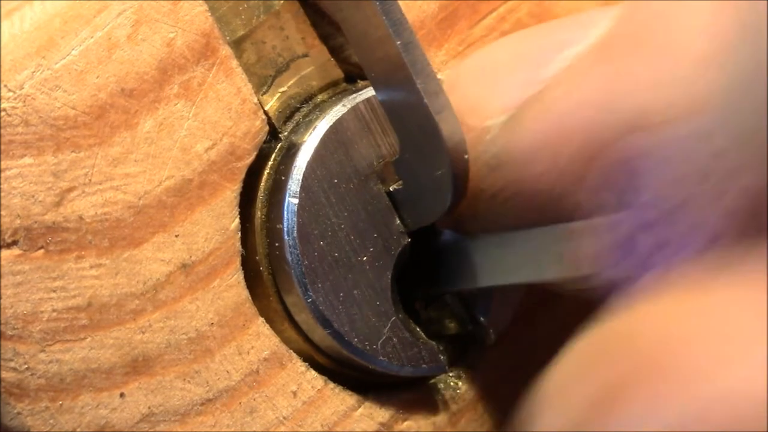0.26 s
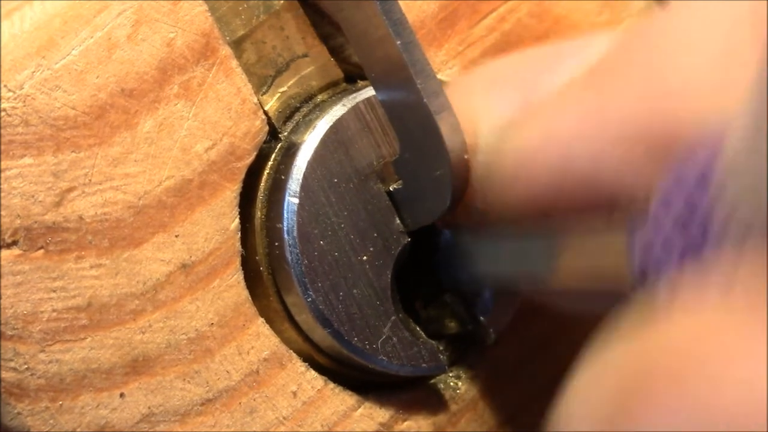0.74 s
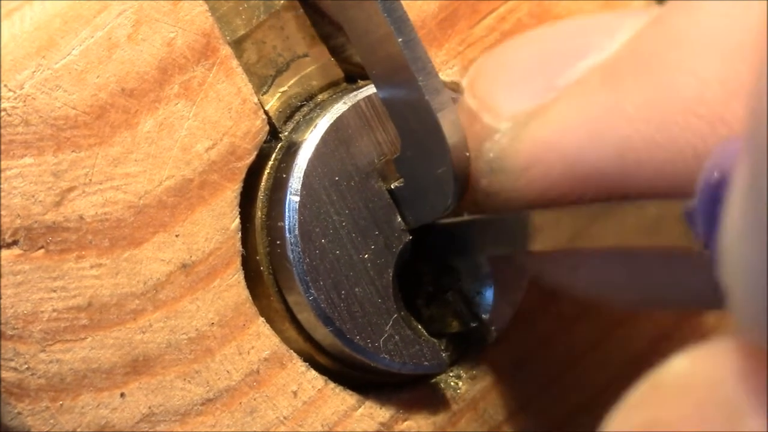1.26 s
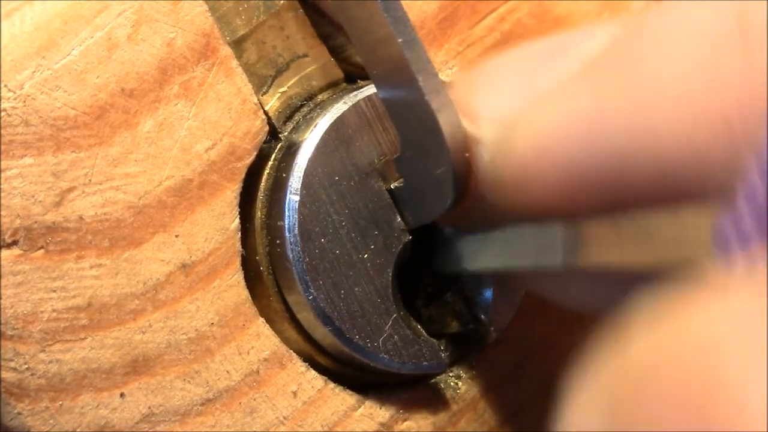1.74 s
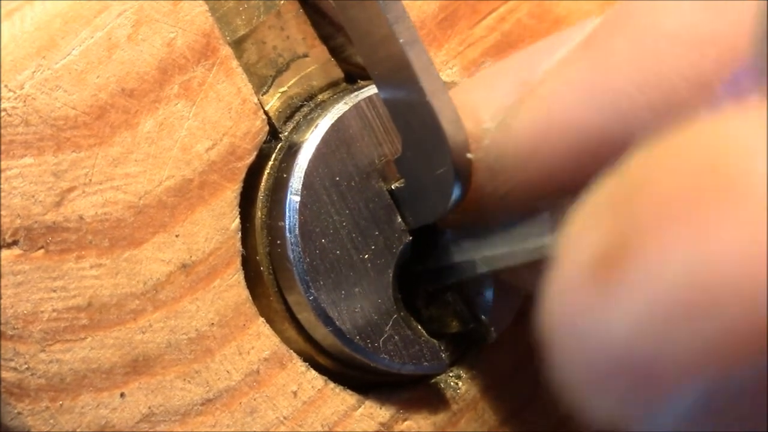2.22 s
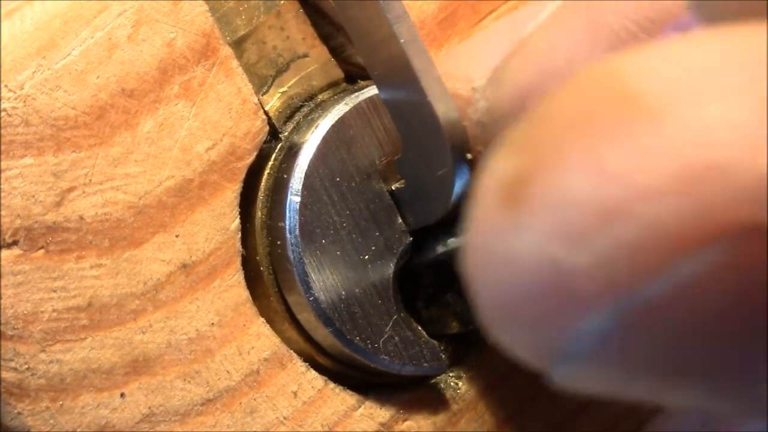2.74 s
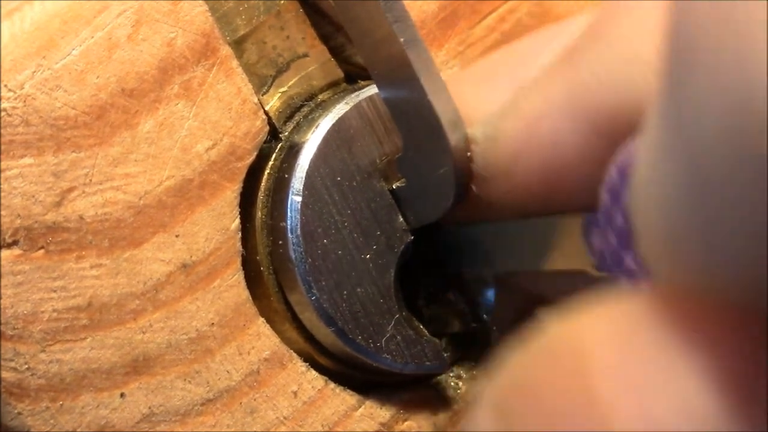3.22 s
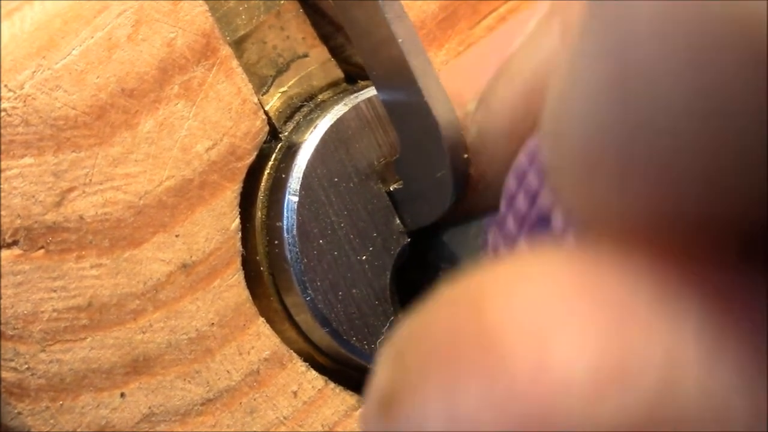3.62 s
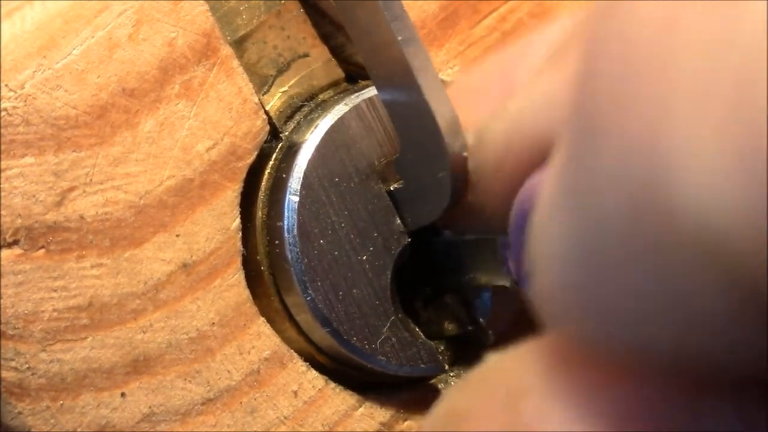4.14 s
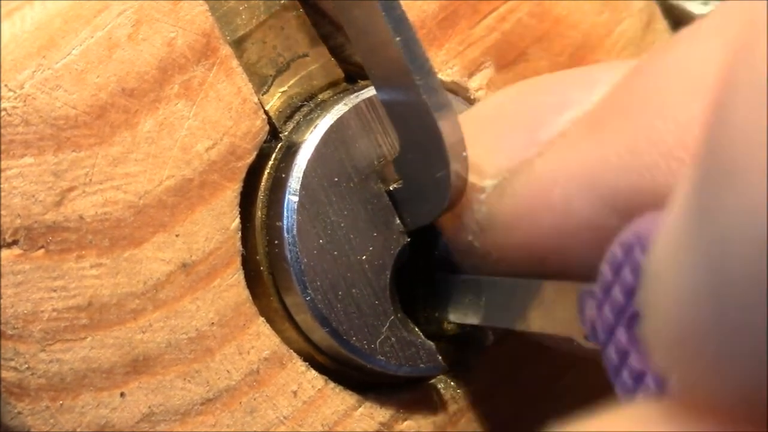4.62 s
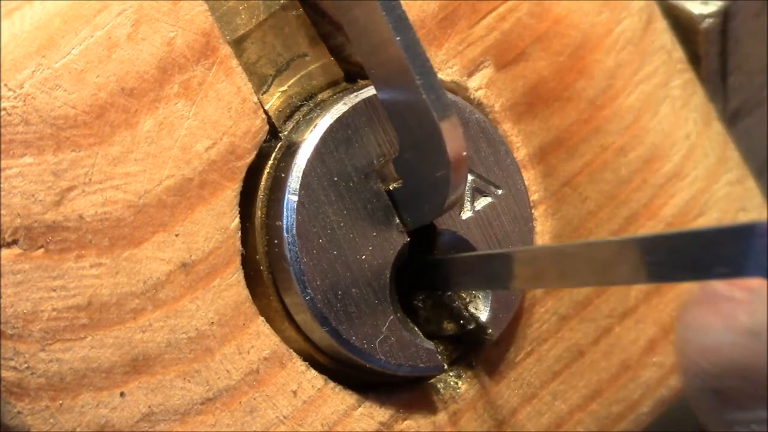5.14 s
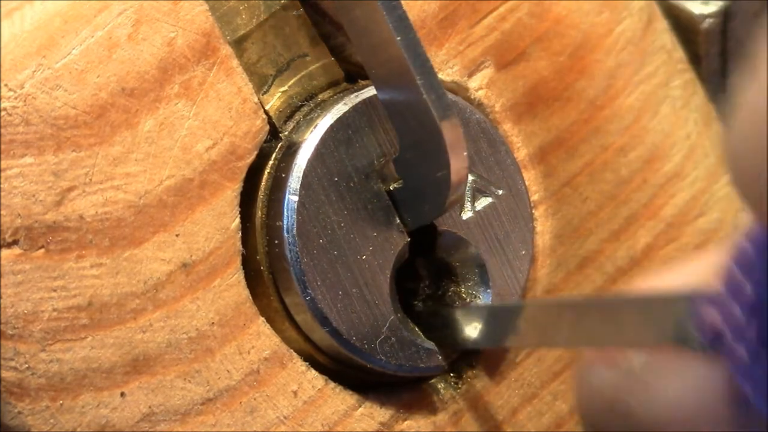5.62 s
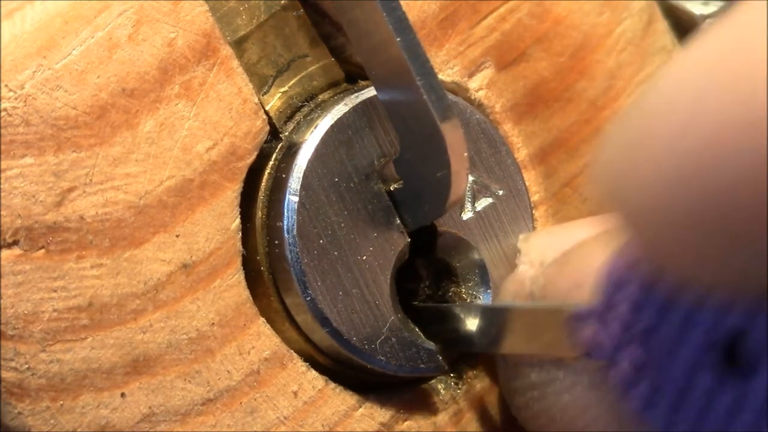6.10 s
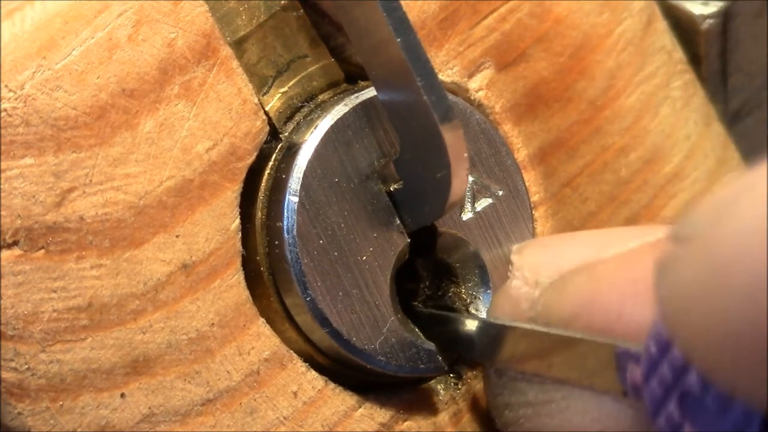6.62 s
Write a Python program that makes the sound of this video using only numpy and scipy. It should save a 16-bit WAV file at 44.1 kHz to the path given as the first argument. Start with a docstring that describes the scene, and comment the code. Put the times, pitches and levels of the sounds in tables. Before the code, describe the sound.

A steel pick probes pins in a lock cylinder mounted in wood, heard very close in a quiet room with soft air, faint low hum and a barely audible thin whine. From 0 to 0.75 s come light ticks and small scrapes, with brighter clicks at 0.3 and 0.4. Hard, gritty snaps cluster at 0.95 to 1.15 s, strongest near 1.08, then again at 1.57, 2.28 and 2.96 s, each with bright steel, a short lock-body ring and a subdued wooden thud. Between them are faint scrapes and finger rustle. After 3 s the clicks thin out: crisp high ticks at 3.54 and 3.86, then soft rasping and ticking from 4.2 to 4.8. Around 5.3 s a very faint hollow rush swells while the pick is reset. A firmer, slightly different-pitched clack comes at 6.13 s, followed by tiny ticks and scrapes until about 6.6 s.

```python
"""Pins snap and chatter for a few milliseconds in a quiet, softly humming room, and a blade scrapes in between.
Place and distance: a lock cylinder in a wooden board, close to a camera's two microphone ports.
A steel pick works the pins; each contact is a gritty burst of force ringing pins, pick, lock body and board.
Strokes along the keyway are noisy slips coloured by steel and lock; fingers rustle on the wood.
Decaying noise tails answer from the walls; air, hum, whine and a brief hollow rush lie beneath."""
import sys
import numpy as np
from scipy import signal
from scipy.fft import rfft, irfft, next_fast_len
from scipy.io import wavfile
from scipy.ndimage import uniform_filter1d, map_coordinates

SR = 44100
rng = np.random.default_rng(int(sys.argv[2]) if len(sys.argv) > 2 else 0)


def unload_wav(signal):
    """Save mono or channel-first audio to the path in sys.argv[1] as 16-bit WAV at rate SR, clipped to [-1, 1]."""
    wavfile.write(
        sys.argv[1],
        SR,
        np.round(np.clip(np.atleast_2d(signal).T, -1, 1) * 32767).astype(np.int16),
    )


N = 302526

# the pick lifts a pin and slips off it; levels are rms over 10 ms:
# [t/s, chatter length/s, pin tick level/dB, pick clack level/dB, lock body level/dB]
CLICKS = [(0.0347, 0.00094, -48.5, -49.5, -49.5), (0.165, 0.0053, -42, -42, -48),
          (0.1854, .0012, -40.5, -44.5, -64), (.22, 0.00042, -52, -56.5, -69),
          (0.2974, .0021, -28, -28, -37.5), (0.3908, 0.004, -32, -33.5, -35.5),
          (0.4085, .0029, -30, -33, -35.5), (0.5656, 0.00062, -43.5, -59.5, -61),
          (0.7327, 0.0022, -55, -57, -53.5), (.746, 0.0022, -35.5, -41.5, -40.5),
          (.956, .0014, -43, -25.5, -24), (1.0335, 0.0031, -20, -25, -26.5),
          (1.0776, 0.0026, -16.5, -15.5, -21.5), (1.135, 0.0013, -26, -32, -33),
          (1.196, 0.0016, -49.5, -46, -51.5), (1.23, .001, -54, -53, -53),
          (1.2364, 0.00047, -34.5, -41, -41.5), (1.3407, 0.0052, -53, -55, -54.5),
          (1.568, 0.0025, -20, -21.5, -23.5), (1.595, 0.0015, -26.5, -30.5, -32),
          (1.7077, 0.00052, -53, -62.5, -58.5), (1.882, 0.00042, -46.5, -53, -61),
          (2.023, 0.00075, -44, -48, -37), (2.1302, 0.0019, -31.5, -41.5, -41.5),
          (2.1355, 0.0019, -37, -39, -43.5), (2.2807, 0.0016, -15, -17, -22),
          (2.3022, 0.0011, -26, -33, -38), (2.3306, 0.0012, -36, -34.5, -37.5),
          (2.4287, 0.0022, -57, -60, -50.5), (2.457, .002, -39, -44.5, -42),
          (2.4865, .004, -37.5, -44, -46), (2.623, 0.0027, -69.5, -59.5, -61),
          (2.746, 0.0017, -74, -69, -55.5), (2.9561, 0.0033, -15, -18, -28),
          (3.2214, 0.00067, -51, -52.5, -53.5), (3.2966, 0.00036, -39, -49, -51.5),
          (3.3025, 0.0015, -35.5, -47, -62), (3.5428, 0.00035, -23, -39, -39.5),
          (3.6267, 0.00072, -51, -54, -61), (3.6374, 0.00034, -45.5, -54.5, -60.5),
          (3.694, .0006, -58, -59.5, -65), (3.846, 0.00028, -56.5, -75, -66),
          (3.8628, 0.00066, -26.5, -38.5, -44.5), (4.0386, .0004, -34, -41.5, -50.5),
          (4.049, 0.00023, -40.5, -49, -67), (4.081, 0.00051, -42.5, -56.5, -63),
          (4.1722, 0.00025, -35.5, -47.5, -52), (4.433, .004, -61, -62, -52),
          (4.7018, 0.0016, -33.5, -46.5, -60.5), (4.7186, 0.0008, -32, -40.5, -45),
          (4.808, 0.00041, -34.5, -49.5, -55.5), (4.8402, 0.00088, -46, -55.5, -51.5),
          (5.1279, 0.0018, -39.5, -42, -48), (5.1755, 0.00063, -51.5, -47.5, -64),
          (5.279, 0.0013, -47, -50, -52.5), (5.4039, 0.00064, -33, -38, -37.5),
          (5.4482, 0.0012, -50, -48, -37.5), (6.1258, 0.0026, -25.5, -26.5, -32.5),
          (6.2287, .0016, -47, -49, -45.5), (6.252, 0.00072, -41.5, -45, -51),
          (6.472, 0.0027, -69, -48.5, -43.5), (6.5833, 0.00072, -56, -56.5, -55.5),
          (6.6016, 0.0019, -51.5, -47, -47)]
# the blade lands and slides in the keyway: [start t/s, length/s, steel rasp level/dB, lock body level/dB]
STROKES = [(.0085, .04, -57.5, -60.5), (0.11, .025, -72, -55), (0.1502, 0.053, -47.5, -51),
           (0.304, 0.043, -55, -57), (0.38, 0.038, -50, -47), (0.6476, 0.084, -63.5, -55),
           (.893, .045, -63.5, -53), (1.263, .12, -63.5, -55), (1.878, 0.055, -56.5, -61.5),
           (2.159, 0.067, -66.5, -57.5), (2.462, 0.067, -54, -54.5), (2.547, 0.041, -71.5, -56),
           (3.273, 0.057, -54, -52), (3.335, 0.055, -65, -59), (3.4777, 0.069, -54.5, -55.5),
           (3.7648, 0.037, -64.5, -56), (3.9656, 0.028, -58.5, -61), (4.21, 0.019, -70, -53),
           (4.241, 0.063, -55, -57), (4.306, 0.11, -50.5, -54), (4.602, 0.056, -52, -56),
           (4.692, 0.093, -47.5, -54), (4.809, .045, -54.5, -56.5), (5.012, 0.065, -64.5, -71),
           (5.109, 0.038, -61.5, -67), (5.25, 0.059, -59.5, -59), (5.575, 0.069, -54.5, -52.5),
           (5.743, 0.053, -69.5, -65.5), (5.977, .03, -58, -61), (6.065, 0.033, -58, -52.5),
           (6.3328, 0.035, -50.5, -57), (6.4366, .05, -65.5, -52.5)]
# resonances of board, lock body, pick and pins: [f/Hz, width/Hz, relative level/dB]
BOARD_MODES = [(127, 24, -3), (163, 19, -9.5), (215, 22, -2), (261, 32, -6.5), (301, 35, -6),
               (357.5, 27, -3), (519, 120, -9)]
BODY_MODES = [(593, 40, -13.5), (712, 98, -15.5), (866, 73, -9), (942, 50, -7), (1037, 56, -5.5),
              (1229, 35, -1), (1257, 37, -1.5), (1356, 41, -4), (1500, 140, -11), (1803, 68, -7),
              (1950, 130, -13.5)]
PICK_MODES = [(2599, 88, 0.5), (3020, 280, -5), (3490, 130, 1.5), (3996, 84, -0.5), (4400, 380, -7),
              (4920, 110, -2.5), (5730, 330, -6.5), (6480, 210, -5.5), (7000, 440, -7.5)]
PIN_MODES = [(7350, 570, -1.5), (8380, 570, -4), (9340, 710, 1), (10070, 360, 4), (10790, 720, -1),
             (11305, 480, 2.5), (12100, 740, -5.5), (12400, 300, -10.5), (12700, 1100, -11.5),
             (14300, 400, -21.5), (15400, 1800, -22.5)]
# resonances with the tip low at the mouth of the keyway: [f/Hz, width/Hz, relative level/dB]
BODY_MODES_SHALLOW = [(563, 85, -14), (882, 63, -3.5), (1010, 106, -7), (1250, 29, 4), (1377, 51, 3.5),
                      (1438, 150, 0.5), (1620, 140, -2), (1806, 85, -4), (1994, 116, -7)]
PIN_MODES_SHALLOW = [(7640, 520, 3.5), (8150, 420, -5), (8900, 730, -3.5), (10100, 500, -5),
                     (11050, 200, -3), (12200, 580, -5.5), (13600, 450, -13), (14800, 700, -16)]
# the lock body, damped by the pressing blade: [f/Hz, width/Hz, relative level/dB]
RUBBED_MODES = [(605, 70, -16.5), (875, 160, -7), (1045, 58, -5.5), (1227, 70, -1.5), (1383, 60, -3),
                (1580, 140, -9), (1802, 140, -8.5), (754, 910, -21.5)]
# colour of the rasping steel: [f/Hz, relative level per Hz/dB]
RASP_COLOUR = [(1200, -14.5), (2200, -8.5), (3100, 4), (4300, -7.5), (5000, -3.5), (5700, -5), (7500, 2.5),
               (8600, -2.5), (10500, -1), (12500, -8), (14500, -16), (16000, -22.5)]
# colour of the room's air: [f/Hz, relative level per Hz/dB]
AIR_COLOUR = [(15, -58), (25, -31.5), (64, -26), (82, -17), (108, -3), (166, -16), (195, -9), (416, -15),
              (545, -20), (624, -15.5), (677, -18), (1020, -18), (1130, -20), (5730, -33.5), (12500, -40.5),
              (16000, -51)]
# reverberation, time to fall by 60 dB: [f/Hz, time/s]
ROOM_T60 = [(120, .45), (500, 0.15), (1300, 0.19), (4000, 0.31), (8000, 0.24), (15000, 0.16)]
# strength of the walls' answer: [f/Hz, level/dB]
ROOM_SEND = [(120, -11.5), (400, -3.5), (1200, -10.5), (2500, -13.5), (4000, -18.5), (6000, -18.5),
             (8000, -23), (12000, -23.5), (16000, -30)]
# stereo width of diffuse sound: [f/Hz, side over mid/ratio]
ROOM_WIDTH = [(25, .4), (60, .1), (120, .08), (300, .2), (1200, .13), (4000, .2), (12000, .2)]
# the board's share of a knock on the lock, before leaning: [lock body level/dB, board thud level/dB]
THUD_LAW = [(-61, -64), (-50.5, -55.5), (-35.5, -45), (-23.5, -35.5)]
# how hard the hand leans on the board: [t/s, relative level/dB]
LEAN = [(0, -11), (.39, 9.5), (.73, 0), (.96, -4.5), (1.22, -4.5), (1.6, -5), (2.02, -5.5), (2.15, 6.5),
        (2.42, 3), (2.7, -3), (2.96, 6.5), (3.55, 2), (4.08, -10), (4.42, 9), (4.52, -1.5), (5.45, -4.5),
        (6.11, 4), (6.86, -10)]
# the knock that opens a stroke: [chatter length/s, level over its rasp/dB, level over its body/dB]
LANDING = (.0014, 0, 4.5)
# a pin brushed on the way, before scatter: [chatter length/s, level over the rasp/dB, level over the body/dB]
BUMP = (.0013, -1, 0)
# the hollow rush: [middle t/s, time from the middle to 1/e of the height/s]
HOLLOW_TIME = (5.28, .33)

SHALLOW_FROM_S = 5.5  # the pick is drawn out and set in again
BUMP_SCATTER_DB = 3
GLANCING_CLACK_DB = -2.5  # pick level in light contacts, over the mean of pins and lock body
THUD_PER_LEAN = 0.77  # leaning couples the lock to the board (dB per dB)
DRAG_DB = -1  # rub of the lock body, over the stroke's lock body level
RESTING_DB = -69.5  # finger rustle while the pick is still, before leaning
SHIFTING_DB, SETTLE_S = -3, .05  # rustle over a stroke's lock body level, before leaning; its lingering
AIR_DB = -63
HOLLOW_HZ, HOLLOW_WIDTH_HZ, HOLLOW_DB = 383, 73, -65.5
WHINE_HZ, WHINE_WIDTH_HZ, WHINE_DB = 5620, 40, -86
TOP_HZ = 16200


def amp(db):
    """Decibels as an amplitude factor."""
    return 10 ** (np.asarray(db) / 20)


def unit(x):
    """x at rms 1."""
    return x / np.sqrt(np.mean(x ** 2) + 1e-20)


def along(points, hz):
    """Curve through (Hz, value) points on a log frequency axis."""
    f, v = np.transpose(points)
    return np.interp(np.log(hz + 1), np.log(f + 1), v)


def wobble(rate):
    """A smooth random curve, rate knots a second."""
    knots = rng.standard_normal(int(N * rate / SR) + 4)
    return map_coordinates(knots, [np.arange(N) * rate / SR])


def filtered(x, response):
    """x times a complex response of frequency."""
    n = x.shape[-1]
    padded = next_fast_len(n + 4096)
    hz = np.fft.rfftfreq(padded, 1 / SR)
    return irfft(rfft(x, padded) * response(hz), padded)[..., :n]


def highpass(x, hz, order):
    """Causal low cut."""
    return signal.sosfilt(signal.butter(order, hz, "high", fs=SR, output="sos"), x)


def resonate(x, modes, scatter_db):
    """x through a bank of resonances, each at a strength that depends on the point of contact."""
    gains = amp(scatter_db * rng.standard_normal(len(modes)))

    def response(f):
        total = 0
        for k, (gain, (centre, width, db)) in enumerate(zip(gains, modes)):
            band = 1j * f * width / (centre ** 2 - f ** 2 + 1j * f * width)
            total = total + (-1) ** k * gain * amp(db) * band  # neighbours alternate in sign
        return total

    return filtered(x, response)


def add(track, s, sound):
    """Mix a sound into the track at s seconds."""
    i = max(round(s * SR), 0)
    part = track[i:i + len(sound)]
    part += sound[:len(part)]


def widen(mid, side):
    """Left and right of a diffuse sound at two close microphone ports."""
    side = filtered(side, lambda hz: along(ROOM_WIDTH, hz))
    return np.array([mid + side, mid - side])


def room_tone():
    """Soft steady air, a faint mains hum and a thin, wavering high whine."""
    noise = rng.standard_normal((2, N))
    mid, side = unit(filtered(noise, lambda hz: amp(along(AIR_COLOUR, hz))))
    hum = amp(-73.0 + 1.3 * wobble(1.1)) * np.sin(2 * np.pi * 100 * np.arange(N) / SR)
    whine = unit(resonate(rng.standard_normal(N), [(WHINE_HZ, WHINE_WIDTH_HZ, 0)], scatter_db=0))
    return amp(AIR_DB) * widen(mid, side) + hum + amp(WHINE_DB + 3 * wobble(3.2)) * whine


def lean_db(s):
    """The hand's weight on the board at s seconds."""
    return np.interp(s, *np.transpose(LEAN))


def friction(rate, spread_db, hiss):
    """Tiny slips at random moments and of very uneven size, over a smooth hiss; rms 1."""
    happens = rng.random(N) < rate / SR
    size = amp(spread_db * np.clip(rng.standard_normal(N), -2, 2))
    slips = happens * size * rng.choice([-1, 1], size=N)
    return unit(unit(slips) + hiss * rng.standard_normal(N))


def hands(rub):
    """Fingers rustle on board and, faintly, lock: more as they lean, and more while they move the pick."""
    keep = np.exp(-1 / (SETTLE_S * SR))
    shifting = signal.lfilter([1 - keep], [1, -keep], rub)
    effort = amp(RESTING_DB) + amp(SHIFTING_DB) * shifting
    pressure = effort * amp(lean_db(np.arange(N) / SR) + 3.5 * wobble(25))
    wood = unit(resonate(rng.standard_normal(N), BOARD_MODES, scatter_db=9.0))
    lock = unit(resonate(friction(rate=160, spread_db=11, hiss=.5), BODY_MODES, scatter_db=1.0))
    return pressure * (amp(-7.5) * highpass(wood, 90, order=3) + amp(-11) * lock)


def strokes(taper):
    """The swell and fade of all strokes, as gains of the steel rasp and of the lock body."""
    rasp, rub = np.zeros(N), np.zeros(N)
    for s, length, rasp_db, body_db in STROKES:
        swell = signal.windows.tukey(int(length * SR), taper)
        add(rasp, s, amp(rasp_db) * swell)
        add(rub, s, amp(body_db) * swell)
    return rasp, rub


def scrapes(rasp, rub):
    """Through each stroke the blade catches and frees itself, rasping the steel and ringing the lock body."""
    # slips bunch into little rushes, about 130 a second at uneven gaps
    times = np.cumsum(rng.uniform(.003, .012, size=N // 100))
    strengths = amp(3 * rng.standard_normal(len(times)))
    catches = np.bincount((times * SR).astype(int), strengths)[:N]
    rushes = signal.lfilter([1], [1, -np.exp(-1 / (.0009 * SR))], catches)  # each dies away in 0.9 ms
    slips = unit((rushes + .1) * friction(rate=3000, spread_db=4, hiss=.8))
    # in and around a stroke the blade trembles against the pins in sparse, faint ticks
    nearby = np.sqrt(np.abs(uniform_filter1d(rasp, SR // 4)))
    tremble = amp(-47.5) * nearby * friction(rate=49, spread_db=5, hiss=.1)

    def colour(hz):
        gain = amp(along(RASP_COLOUR, hz))
        return gain / np.sqrt(np.mean(gain ** 2))

    steel = filtered(rasp * slips + tremble, colour)
    # the heavy lock body feels the steady drag more than the single slips
    drag = .6 * slips + rng.standard_normal(N)
    body = rub * unit(resonate(drag, RUBBED_MODES, scatter_db=6.5))
    return steel + amp(DRAG_DB) * body


def brushes(count):
    """Every stroke lands with a light knock, then bumps over count pins at chance moments; rows as in CLICKS."""
    rows = []
    for s, length, rasp_db, body_db in STROKES:
        contacts = [(s, LANDING, 0)]
        for _ in range(count):
            when = s + length * rng.uniform(.2, .8)
            contacts.append((when, BUMP, BUMP_SCATTER_DB * rng.standard_normal()))
        for when, (chatter_s, over_rasp_db, over_body_db), chance_db in contacts:
            tick_db = rasp_db + over_rasp_db + chance_db
            knock_db = body_db + over_body_db + chance_db
            clack_db = (tick_db + knock_db) / 2 + GLANCING_CLACK_DB
            rows.append((when, chatter_s, tick_db, clack_db, knock_db))
    return rows


def chatter(t, length):
    """Contact force, 1 ms into t: an impact and two rebounds in a gritty rattle, nearly even in pitch."""
    age = t - .001
    # a brief tick stops at once, a long rattle lingers
    hold = np.exp(-np.maximum(age - length, 0) / (0.95 * length))
    force = rng.standard_normal(len(t)) * (age > 0) * hold / np.sqrt(length * SR)
    when = length * np.array([0, rng.uniform(.25, .55), rng.uniform(.7, 1)])
    force[np.searchsorted(age, when)] += [1, .7, .5] * rng.choice([-1, 1], size=3)
    # flatten the spectrum, so that all pitches are excited about alike
    spectrum = rfft(force)
    size = np.abs(spectrum)
    force = irfft(spectrum / (size + 0.12 * size.mean()) ** 0.91, len(t))
    return force * np.clip(t / .001, 0, 1) ** 5 * np.sqrt(hold)


def level(x, db):
    """x at the given rms over 10 ms."""
    return amp(db) * x * np.sqrt(SR / 100 / np.sum(x ** 2))


def steel_spray(t, tick_db, clack_db):
    """Steel summed over all directions: one sharp, smooth-spectrum blow without ringing, in a high and a lower band."""
    blow = np.exp(-t / .00004)
    high = highpass(blow, 6400, order=2)
    lower = filtered(highpass(blow, 3000, order=3), lambda hz: 1 / (1 + 1j * hz / 8500) ** 2)
    return level(high, tick_db) + level(lower, clack_db)


def clicks():
    """Each contact rings pins, pick and lock body and pushes the board; returns near sound and wall feed."""
    near, far = np.zeros(N), np.zeros(N)
    t = np.arange(next_fast_len(SR // 7)) / SR
    for s, length, tick_db, clack_db, body_db in CLICKS + brushes(count=2):
        force = chatter(t, max(length, .0003))
        deep = s < SHALLOW_FROM_S
        pin_modes = PIN_MODES if deep else PIN_MODES_SHALLOW
        body_modes = BODY_MODES if deep else BODY_MODES_SHALLOW
        # the bare crack of the contact fills the gaps between the steel's modes
        crack = unit(highpass(force, 7900, order=2))
        pins = unit(resonate(force, pin_modes, scatter_db=3.0))
        tick = highpass(pins + .5 * crack, 5730, order=3)
        # the pick's pitch shifts with how deep it sits in the keyway
        depth = 1 + 0.08 * rng.uniform(-0.63, 1)
        pick = resonate(force, np.multiply(PICK_MODES, [depth, 1, 1]), scatter_db=2.0)
        clack = highpass(pick, 2300, order=3)
        steel = level(tick, tick_db) + level(clack, clack_db)
        body = level(resonate(force, body_modes, scatter_db=2.0), body_db)
        thud_db = np.interp(body_db, *np.transpose(THUD_LAW)) + THUD_PER_LEAN * lean_db(s)
        board = resonate(np.exp(-t / 0.0008), BOARD_MODES, scatter_db=3.5)
        thud = level(highpass(board, 95, order=3), thud_db)
        start = s - .001  # the force has 1 ms of lead
        add(near, start, steel + body + thud)
        spray = steel_spray(t, tick_db, clack_db)
        # hard snaps carry further than light ticks
        carry = amp(np.interp(clack_db, [-38, -20], [-2, .5]))
        add(far, start, (0.87 * spray + 0.44 * steel + body + thud) * carry)
    return near, far


def room(x):
    """The walls answer each third of a second with a fresh, nearly mono tail of decaying noise."""
    wet, block = np.zeros((2, N)), SR // 3
    for i in range(0, N, block):
        hz, t, z = signal.stft(rng.standard_normal((2, SR // 2)), SR, nperseg=256)
        t60 = along(ROOM_T60, hz)[:, None]
        decay = amp(along(ROOM_SEND, hz)[:, None] - 60 * t / t60)
        shape = decay * np.sqrt(np.log(1e6) / (t60 * SR))  # same tail energy for any decay time
        tails = signal.istft(z * shape, SR, nperseg=256)[1]
        for channel, tail in zip(wet, tails):
            add(channel, i / SR + .004, signal.fftconvolve(x[i:i + block], tail))
    return widen(*wet)


def hollow_rush():
    """A faint, narrow band of noise rises out of the quiet and sinks back."""
    middle, half = HOLLOW_TIME
    swell = np.exp(-((np.arange(N) / SR - middle) / half) ** 2)
    band = unit(resonate(rng.standard_normal(N), [(HOLLOW_HZ, HOLLOW_WIDTH_HZ, 0)], scatter_db=0))
    return amp(HOLLOW_DB) * swell * band


def place(x):
    """The lock sits just right of centre, more so in the treble; a late treble glances off the hand."""
    def ports(hz):
        pan_db = along([(2000, 0.08), (6000, 0.2), (14000, 0.5)], hz)
        # the glance arrives 0.43 ms later, with opposite sign at the two ports
        strength = along([(1200, .01), (3000, .06), (12000, .13)], hz)
        glance = strength * np.exp(-2j * np.pi * hz * 0.00043)
        return np.array([amp(-pan_db) + glance, amp(pan_db) - glance])

    return filtered(x, ports)


def scene():
    """Close direct sound of lock and hands, the walls' answer, and the quiet of the room."""
    near, far = clicks()
    rasp, rub = strokes(taper=.5)
    rubbing = scrapes(rasp, rub) + hands(rub)
    return place(near + rubbing) + room(far + rubbing) + room_tone() + hollow_rush()


def record(dry):
    """Tallest peaks are rounded off; nothing sounds above about 16 kHz."""
    rounded = dry / (1 + np.abs(dry / .9) ** 6) ** (1 / 6)
    return filtered(rounded, lambda hz: 1 / np.sqrt(1 + (hz / TOP_HZ) ** 160))


dry = scene()
out = record(dry)
unload_wav(out)
```